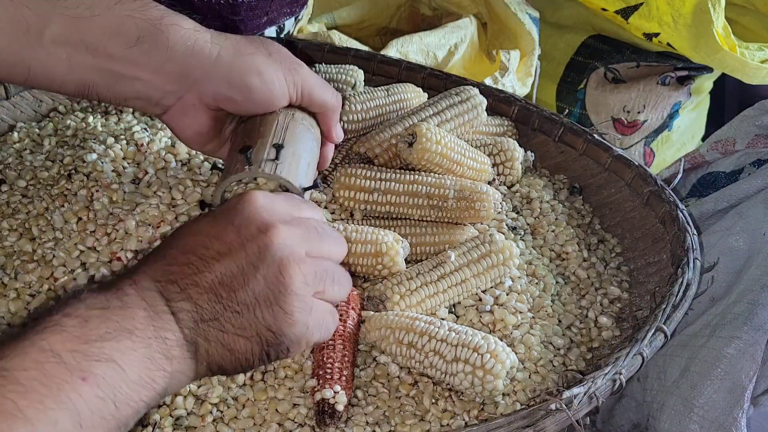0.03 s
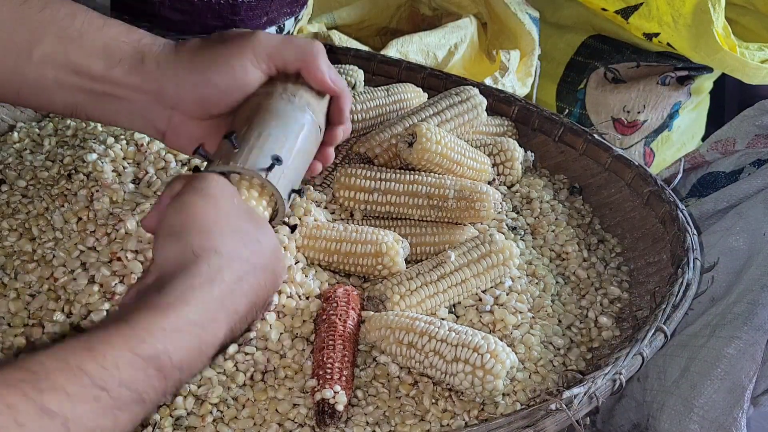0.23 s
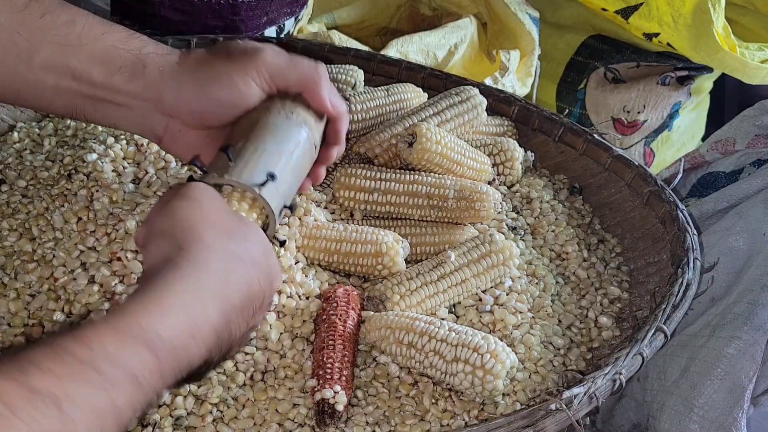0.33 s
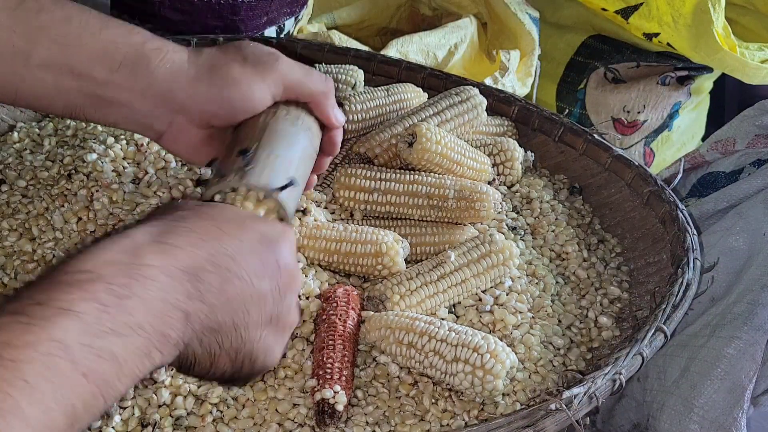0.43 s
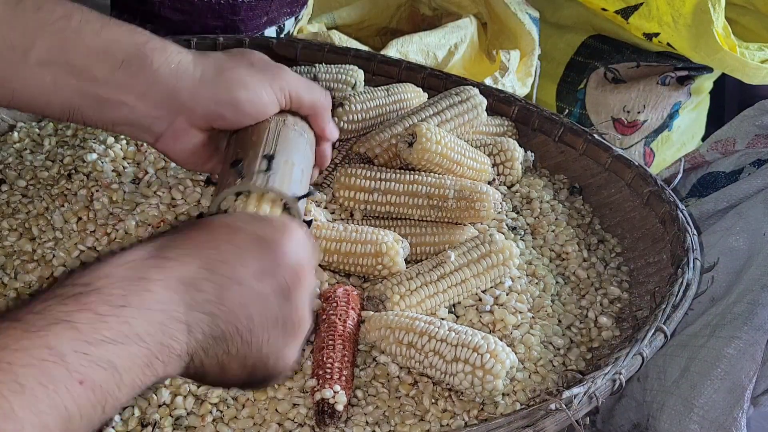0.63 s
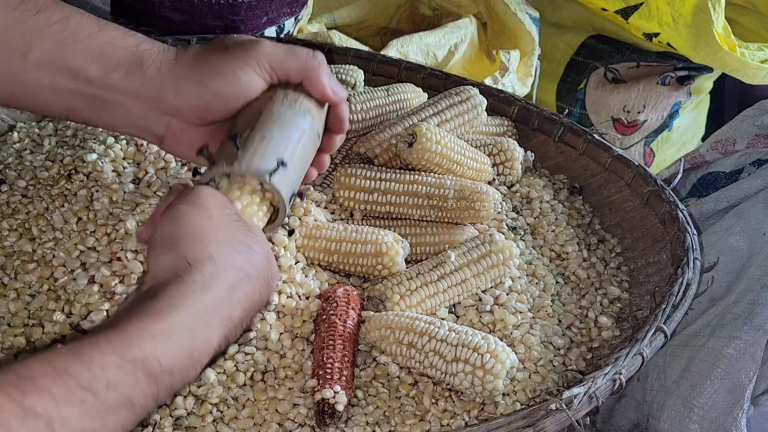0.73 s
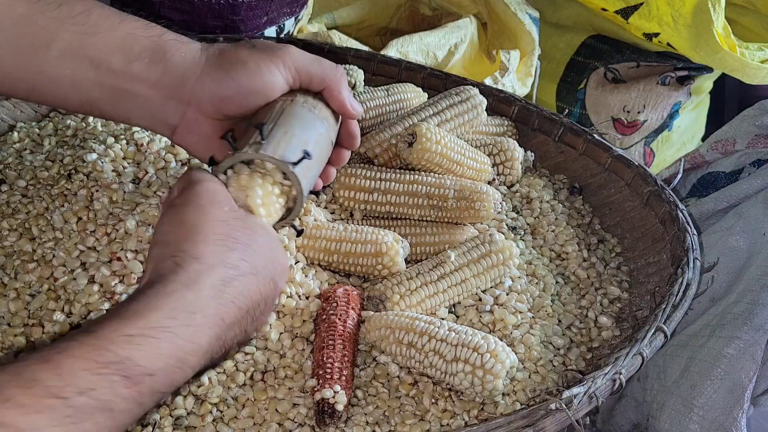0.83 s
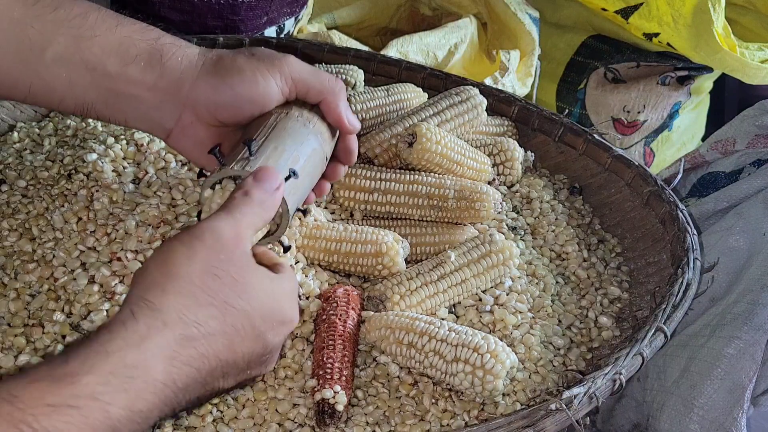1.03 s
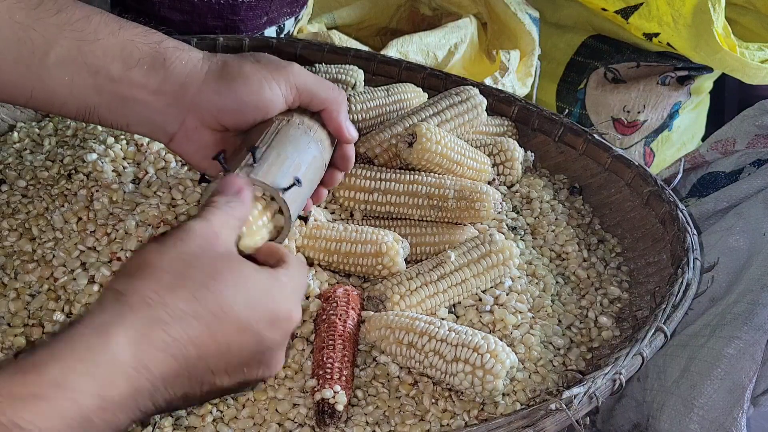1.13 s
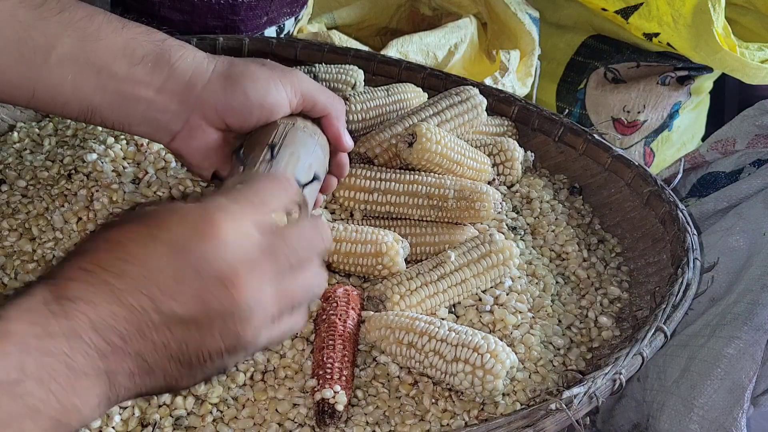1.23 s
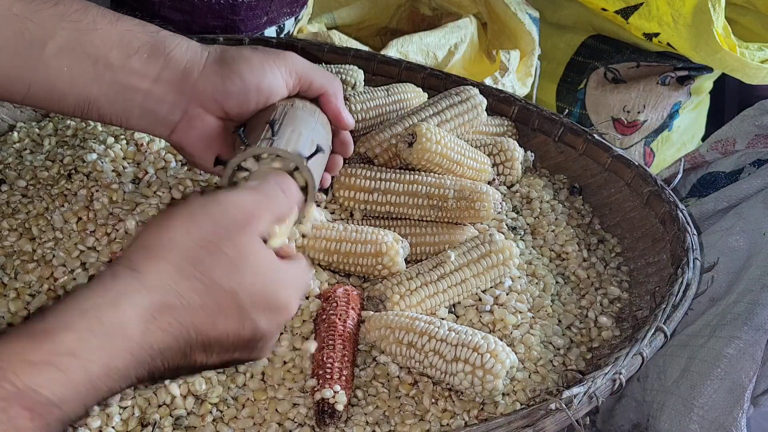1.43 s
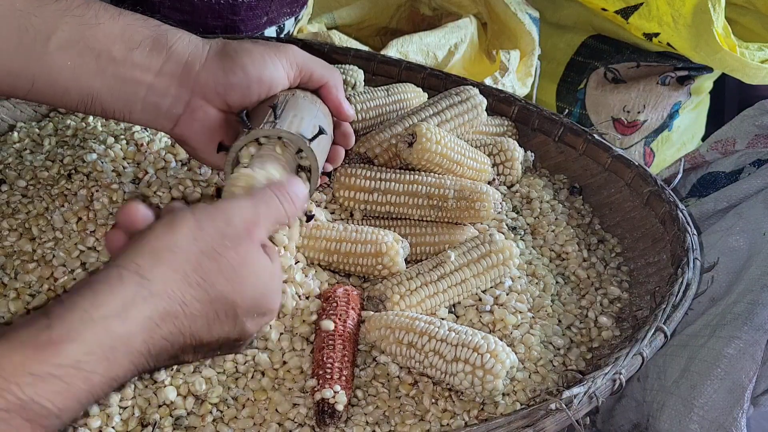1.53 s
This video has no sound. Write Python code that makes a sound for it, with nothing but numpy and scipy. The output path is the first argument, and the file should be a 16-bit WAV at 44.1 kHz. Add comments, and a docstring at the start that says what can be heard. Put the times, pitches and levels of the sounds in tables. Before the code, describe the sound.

Dry corn kernels are stripped from a cob, close and slightly left in stereo. Grainy scraping builds to a loud crunch with sharp snaps and a dull hollow knock around 0.2 s, then shorter crunches follow near 0.48 and 0.7 s. After near-quiet from 0.8 s, the cob rustles faintly from 1.1 s to the end, with tiny ticks and a weak knock near 1.4 s. Low distant outdoor rumble continues underneath.

```python
"""Outdoors, a low distant rumble and faint air lie underneath throughout.
From the start, close to a stereo camera, the nails of a short bamboo tube twist dry corn kernels off a cob:
over three twists, dense scraping grains crunch, kernels snap in short flurries and the tube knocks dully.
After a pause the hand regrips from about 1.1 s and the cob rustles softly, with faint snaps and knocks.
The basket and the heap of corn answer the handwork with a short scattered tail."""
import sys
import numpy as np
from scipy import signal
from scipy.fft import rfft, irfft, next_fast_len
from scipy.io import wavfile
from scipy.ndimage import map_coordinates

SR = 44100
rng = np.random.default_rng(int(sys.argv[2]) if len(sys.argv) > 2 else 0)


def level_to_linear(level):
    """Convert decibel levels to linear amplitude factors, elementwise."""
    exponent = np.asarray(level, float) / 20
    return 10 ** exponent


def wav_record(signal):
    """Record a signal, one row per channel, as 16-bit PCM in the file named by sys.argv[1]."""
    frames = np.transpose(np.atleast_2d(signal))
    bounded = np.clip(frames, -1, 1)
    # unit amplitude maps onto the largest positive 16-bit level
    quanta = np.round(bounded * 32767).astype(np.int16)
    wavfile.write(sys.argv[1], SR, quanta)


N = 70560  # samples, 1.6 s

# Levels in the tables are relative.
# Outdoor air, spectrum of the noise: f/Hz, density/(dB per Hz)
AIR_SPECTRUM = [(12, -60), (20, -12), (33, -16), (91, -0.5), (116, -4.5), (134, -13.5), (172, -7.5),
                (234, -20), (319, -12), (367, -16.5), (738, -25), (897, -31.5), (1810, -31.5),
                (1960, -31.5), (16000, -55.5)]
# Outdoor air, likeness of left and right: f/Hz, correlation (1 is mono)
AIR_LIKENESS = [(60, .99), (130, 1), (290, 0.543), (640, 1), (1400, 0.663), (3000, .2), (15000, 0.075)]
# Distant rumble, wavering low tones: f/Hz, half-width/Hz, level/dB
HUMS = [(82.8, 3, -56), (106, 3.3, -59), (191, 4.7, -70), (52, 10, -64)]
# Decay of the basket and the heap: f/Hz, T60/s
BASKET_DECAY = [(300, 0.16), (2000, .12), (6000, 0.09), (14000, 0.032)]
# Jolts of the tube: t/s, level/dB
JOLTS = [(0.122, -34), (0.2007, -26), (.36, -40), (0.4707, -28.5), (.671, -53), (1.387, -35.5),
         (1.404, -48.5)]
# Scraping strokes of the twists: t/s, level/dB, brightness/(dB per octave)
TWIST = [(0, -55, -3), (.014, -54.5, -8), (.03, -41.5, -3.5), (.06, -61, -4.5), (.088, -71.5, 8),
         (.11, -50, -2.5), (.16, -45.5, -0.5), (.18, -39, 0), (.195, -37.5, -6.5), (.212, -34, 1),
         (.228, -32, -4.5), (.246, -45, -2), (.28, -56.5, -2.5), (.332, -71, -4), (.352, -60.5, -8.5),
         (.40, -59.5, -4), (.446, -56, -8), (.466, -46.5, 1), (.48, -33, -3.5), (.5, -52, -2),
         (.53, -56.5, -0.5), (.6, -85, -4), (.616, -62.5, -4), (.664, -54, -7), (.68, -35, -3.5),
         (.7, -45, -5.5), (.725, -40.5, -2), (.75, -59.5, -2), (.8, -69.5, -7.5)]
# Rustling of the regrip: t/s, level/dB, brightness/(dB per octave)
REGRIP = [(1.07, -82, -1.6), (1.1, -69.5, -2), (1.125, -61, -1.5), (1.156, -71, -2.2), (1.18, -56, -2.3),
          (1.205, -59, 0.43), (1.234, -48.5, -2.2), (1.26, -59.5, 0), (1.304, -79, -0.22),
          (1.322, -69, 0.44), (1.345, -61.5, -0.8), (1.396, -51.5, 1), (1.415, -65, -0.57), (1.434, -53, 1),
          (1.5, -58.5, -1.7), (1.534, -75, 0), (1.558, -68, 0.59), (1.575, -52.5, 1), (1.6, -60.5, 1)]
# Colour of the crunching twists: f/Hz, density/(dB per Hz)
CRUNCH_SPECTRUM = [(180, -36), (300, -10.5), (348, -5), (418, -14), (574, -18), (1150, -6), (1250, -6),
                   (2170, -15), (2610, -3.5), (3640, -2), (5610, 5), (8220, -3), (14000, -12.5),
                   (16000, -16)]
# Colour of the rustling cob: f/Hz, density/(dB per Hz)
RUSTLE_SPECTRUM = [(410, -45), (700, -21), (767, 1), (1150, -2.5), (1300, -40.5), (1710, 3), (1920, -15),
                   (2880, 5.5), (3840, -1.5), (5190, 4), (6320, -3.5), (7110, 6), (9110, -12.5),
                   (14800, -15.5), (16000, -14)]
# Kernels breaking loose: t/s, peak level/dB, pitch f/Hz, length/s, crumbling trail re peak/dB
SNAPS = [(.0238, -28, 3050, .004, -14), (.0428, -29, 5190, .004, -14), (.0937, -16, 7340, .0025, -18),
         (.1, -27, 7340, .002, -16), (.1231, -25, 1300, .003, -16), (.1426, -26, 1300, .003, -16),
         (.149, -26, 3150, .002, -16), (.1765, -23, 2830, .006, -16), (.1998, -6, 5500, .003, -16),
         (.2035, -9, 4700, .0025, -18), (.2238, -13, 4140, .002, -16), (.2295, -17, 3400, .004, -16),
         (.3476, -41, 1540, .003, -14), (.3676, -39, 3020, .003, -14), (.3935, -42, 2280, .003, -14),
         (.4189, -34, 5450, .004, -14), (.4529, -28, 5420, .003, -16), (.4702, -13, 2900, .003, -14),
         (.477, -18, 5060, .003, -16), (.487, -21, 2860, .002, -16), (.4955, -17, 6820, .0015, -20),
         (.565, -44, 9000, .002, -16), (.6125, -44, 2540, .003, -12), (.6379, -41, 1170, .003, -14),
         (.671, -17, 4600, .003, -12), (.688, -25, 2830, .003, -16), (.7095, -18, 1200, .002, -14),
         (.7118, -19, 5500, .0015, -14), (.7325, -24, 6500, .002, -16), (.868, -58, 7000, .003, -10),
         (.9138, -58, 1790, .003, -12), (1.1199, -30, 4840, .0015, -12), (1.1727, -33, 4800, .003, -12),
         (1.2176, -38, 3420, .004, -12), (1.234, -36, 5200, .003, -14), (1.3359, -37, 14000, .002, -18),
         (1.3748, -46, 1750, .004, -10), (1.3765, -40, 13500, .002, -16), (1.392, -42, 12000, .002, -14),
         (1.405, -38, 14000, .002, -16), (1.4351, -38, 7000, .003, -14), (1.5464, -47, 1240, .003, -20),
         (1.5793, -38, 9060, .002, -14)]
# Stereo picture of the camera: f/Hz, phase by which the left is turned ahead/rad
STEREO_TURN = [(60, .2), (190, .3), (300, 1.4), (600, 1.4), (1500, .8), (3000, .4), (6000, -1.0),
               (12000, .3)]

AIR_DB = -50  # dB, rms of the noise without the hums
BASKET_DB = -9  # dB, scattered tail against the direct sound
THUMP_HZ, THUMP_T60, THUMP_RISE_S = 343, 0.066, 0.0034  # Hz, s, s: the tube's hollow knock
GRAINS_PER_S, GRAIN_CYCLES = 12000, 4.82  # density; a grain's length in its own cycles
GRAIN_SPREAD_DB, CLUMP_DB, CLUMPS_PER_S = 2.2, 1, 160  # size spread; slow unevenness and its knots a second
TRAIL_T60, TRAIL_DB = .045, -3  # s, dB: decay and common level of the crumbling trails
SNAP_GRAINS, SNAP_CYCLES, SNAP_DB = 36, 4.5, -8  # grains a snap, length of each in cycles, level/dB
SNAP_FOCUS, SNAP_THIN = 4, 4  # dB lost per octave from the pitch; further dB per octave below it
NOTE_CYCLES, NOTE_DB = 10, -8  # the kernel's own short note: length in cycles, level/dB
THIN_HZ = 280  # small kernels radiate little below
LAG_S, LAG_SPREAD_S = 9e-5, 2.5e-5  # s, mean and spread of the right port's delay
PAN_SPREAD_DB = 3  # dB, spread of the level difference between the ports


def unit(x):
    """Scales a signal to rms 1."""
    return x / np.sqrt(np.mean(x ** 2) + 1e-20)


def along(points, hz):
    """Reads (f/Hz, value) points on a logarithmic frequency axis."""
    f, value = np.transpose(points)
    return np.interp(np.log(hz + 1), np.log(f + 1), value)


def wobble(rate, s):
    """A smooth random curve with rate knots a second, read at times s."""
    knots = rng.standard_normal(int(N * rate / SR) + 4)
    return map_coordinates(knots, [s * rate])


def filtered(x, response):
    """Multiplies the spectrum of x by a complex response of frequency."""
    m = next_fast_len(N + SR // 2)
    return irfft(rfft(x, m) * response(np.fft.rfftfreq(m, 1 / SR)), m)[..., :N]


def air():
    """Smooth outdoor noise, near mono in the bass, over a rumble of narrow noise bands."""
    def mid_side(hz):
        angle = np.arccos(np.clip(along(AIR_LIKENESS, hz), -1, 1)) / 2
        return level_to_linear(along(AIR_SPECTRUM, hz)) * [np.cos(angle), np.sin(angle)]

    mid, side = filtered(rng.standard_normal((2, N)), mid_side)
    noise = level_to_linear(AIR_DB) * unit(np.array([mid + side, mid - side]))
    rumble = np.zeros(N)
    for hz, width_hz, level_db in HUMS:
        tone = filtered(rng.standard_normal(N), lambda f: np.exp(-((f - hz) / width_hz) ** 2))
        rumble += level_to_linear(level_db) * unit(tone)
    return noise + rumble * level_to_linear([[-.5], [.5]])


def basket(x):
    """Scattered answer of the basket and the heap; a new decaying pattern every tenth of a second."""
    out, step = np.zeros((2, N + SR)), SR // 10
    for i in range(0, N, step):
        noise = rng.standard_normal((2, SR // 5))
        hz, t, z = signal.stft(noise, SR, nperseg=128)
        decay = level_to_linear(-60 * t / along(BASKET_DECAY, hz)[:, None])
        tail = signal.istft(z * decay, SR, nperseg=128)[1]
        wet = signal.fftconvolve(x[:, i:i + step], tail / np.linalg.norm(tail[0]), axes=1)
        out[:, i:i + wet.shape[1]] += wet
    return out[:, :N]


def tube():
    """The jolted hollow tube knocks dully: one softly rising, damped resonance."""
    at, level_db = np.transpose(JOLTS)
    blows = np.bincount((at * SR).astype(int), level_to_linear(level_db), N)
    t = np.arange(SR // 8) / SR
    envelope = (1 - np.exp(-t / THUMP_RISE_S)) * level_to_linear(-60 * t / THUMP_T60)
    knock = envelope * np.sin(2 * np.pi * THUMP_HZ * t)
    return signal.fftconvolve(blows, knock)[:N]


def grains(s, hz, gain, cycles, draw, size=160):
    """Softly starting damped sines that reach the two microphone ports at slightly different times."""
    out, k = np.zeros((2, N)), np.arange(size)
    # six time constants fill the wanted cycles, or the window of size samples if that is shorter
    life = (np.minimum(cycles / hz, size / SR) / 6)[:, None]
    pan_db = PAN_SPREAD_DB * rng.standard_normal(len(s))
    right = s + LAG_S + LAG_SPREAD_S * draw
    for port, arrival in enumerate([s, right]):
        first = np.ceil(arrival * SR).astype(int)
        t = ((first - arrival * SR)[:, None] + k) / SR
        # one draw moves the left by half of it, the right by one and a half times
        level = (gain * level_to_linear(pan_db * (-0.5 - port)))[:, None]
        envelope = np.e * t / life * np.exp(-t / life)
        wave = level * envelope * np.sin(2 * np.pi * hz[:, None] * t)
        place = np.abs(first)[:, None] + k
        out[port] = np.bincount(place.ravel(), wave.ravel(), N + SR)[:N]
    return out


def scrape(curve, spectrum):
    """Friction as dense clumped grains of all pitches, under the stroke and in the trail of each snap."""
    at, level_db, bright = np.transpose(curve)
    count = int(GRAINS_PER_S * (at[-1] - at[0]))
    u, lag = rng.random((count, 3)), rng.standard_normal(count)
    s = at[0] + (at[-1] - at[0]) * u[:, 0]
    lo, hi = spectrum[0][0], spectrum[-1][0]
    hz = lo * (hi / lo) ** np.sqrt(u[:, 1])  # more grains towards the treble
    uneven_db = -GRAIN_SPREAD_DB * np.log(1 - u[:, 2]) + CLUMP_DB * wobble(CLUMPS_PER_S, s)
    size = hz * level_to_linear(along(spectrum, hz) + uneven_db) / (u[:, 1] + .02) ** 0.19
    # even out the power of the whole crowd
    size = size / np.sqrt(np.mean(size ** 2 * GRAIN_CYCLES / hz) * GRAINS_PER_S / 16)
    trail = np.zeros(count)  # power
    for t, peak_db, _, _, trail_db in SNAPS:
        fading_db = peak_db + TRAIL_DB + trail_db - 60 * np.abs(s - t) / TRAIL_T60
        trail += (s > t) * level_to_linear(2 * fading_db)
    level = np.sqrt(level_to_linear(2 * np.interp(s, at, level_db)) + trail)
    tilt = level_to_linear(np.interp(s, at, bright) * np.log2(hz / 4500))
    return grains(s, hz, size * level * tilt, GRAIN_CYCLES, lag)


def snaps():
    """Each kernel breaks in a short flurry of grains, loudest near its pitch, with one short note on it."""
    at, peak_db, pitch, length = np.transpose(SNAPS)[:4, :, None]
    u = rng.random((len(SNAPS), 2, SNAP_GRAINS))
    lag = rng.standard_normal((len(SNAPS), SNAP_GRAINS))
    rank = (np.arange(SNAP_GRAINS) + u[:, 0]) / SNAP_GRAINS
    hz = 600 * (15500 / 600) ** (rank ** .7)
    off_pitch_db = SNAP_FOCUS * np.abs(np.log2(hz / pitch)) + SNAP_THIN * np.maximum(np.log2(pitch / hz), 0)
    fade_db = 5 * u[:, 1]  # later grains are weaker
    gain = level_to_linear(peak_db + SNAP_DB - off_pitch_db - fade_db) * np.sqrt(length / .003)
    s = at + length * u[:, 1]
    crack = grains(s.ravel(), hz.ravel(), gain.ravel(), SNAP_CYCLES, lag.ravel())
    note_at, note_gain = at + length / 3, level_to_linear(peak_db + NOTE_DB)
    note = grains(note_at.ravel(), pitch.ravel(), note_gain.ravel(), NOTE_CYCLES, lag[:, 0])
    return crack + note


def scene():
    """Air behind, the basket's answer, and the hands at work close by, a little to the left."""
    corn = tube() + scrape(TWIST, CRUNCH_SPECTRUM) + scrape(REGRIP, RUSTLE_SPECTRUM) + snaps()
    corn = corn * level_to_linear([[3.8], [2.2]])  # dB, left and right
    # three first-order high passes
    corn = filtered(corn, lambda hz: (1j * hz / (THIN_HZ + 1j * hz)) ** 3)
    return air() + level_to_linear(BASKET_DB) * basket(corn) + corn


def low_pass(x):
    """Removes everything above the highest recorded frequency."""
    return signal.sosfilt(signal.butter(12, 16630, fs=SR, output="sos"), x)


def record(dry):
    """The camera widens the stereo picture by turning the phase between its channels."""
    wide = filtered(dry, lambda hz: np.exp(.5j * np.outer([1, -1], along(STEREO_TURN, hz))))
    return low_pass(wide)


dry = scene()
out = record(dry)
wav_record(out)
```